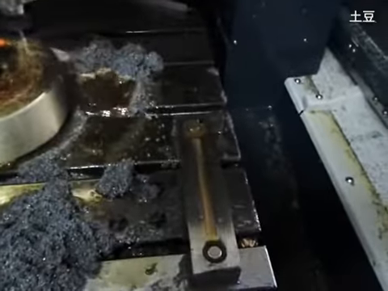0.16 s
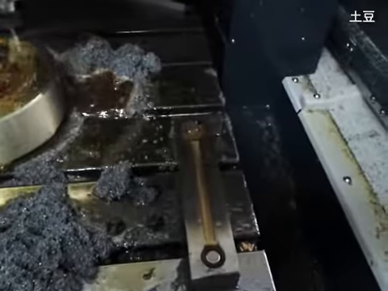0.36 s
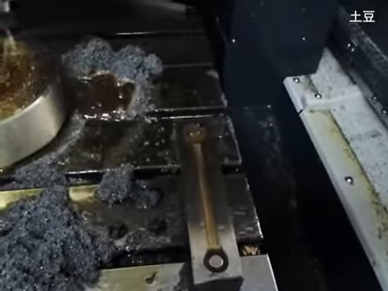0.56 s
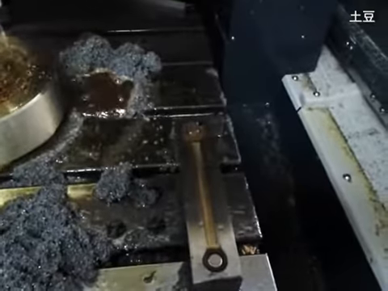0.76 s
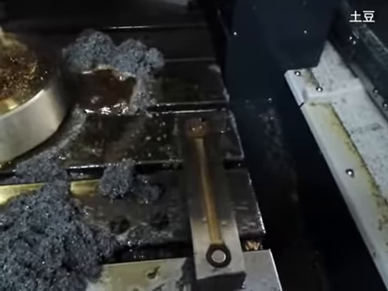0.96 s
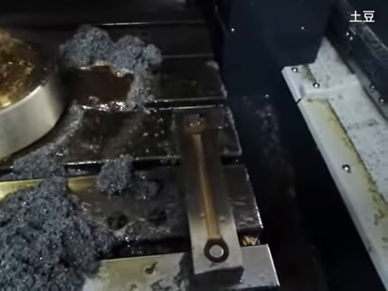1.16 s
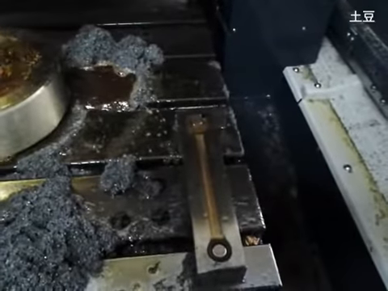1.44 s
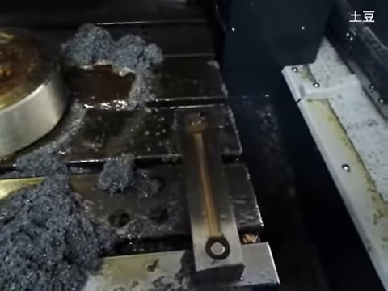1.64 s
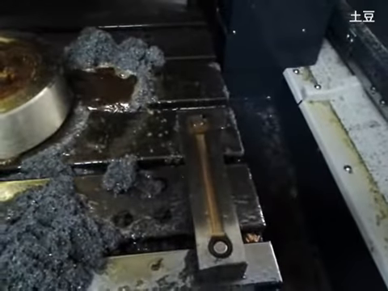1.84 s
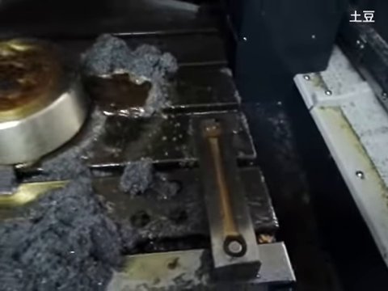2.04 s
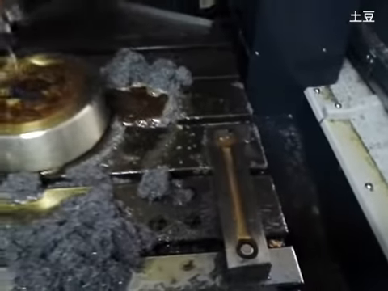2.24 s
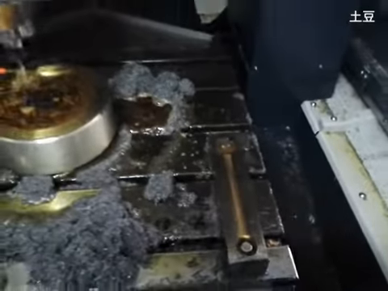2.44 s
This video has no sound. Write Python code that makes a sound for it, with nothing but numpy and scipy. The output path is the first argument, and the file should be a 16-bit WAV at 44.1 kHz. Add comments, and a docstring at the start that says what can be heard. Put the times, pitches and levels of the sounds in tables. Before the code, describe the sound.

A milling machine spindle whines loudly and steadily as it cuts metal in a workshop. Its tones swell and fade as the nearby microphone moves, over a rasping cut, brief chip scrapes, coolant hiss and humming pumps.

```python
"""Milling metal in a workshop

A spindle turns steadily inside a machine enclosure and whines at multiples of its turning rate.
The whines swell and fade as the microphone moves through standing waves (loud and quiet spots).
The motor drive whistles above them, the cut rasps with each turn and chips scrape now and then.
Coolant spray hisses, and pumps hum over the workshop's rumble."""
import sys
import numpy as np
from scipy import signal
from scipy.fft import rfft, irfft
from scipy.io import wavfile

SR = 44100
rng = np.random.default_rng(int(sys.argv[2]) if len(sys.argv) > 2 else 0)


def to_wav(s):
    """Save 16-bit WAV."""
    ch = np.atleast_2d(s).T  # columns
    pcm = np.round(np.clip(ch, -1, 1) * 32767)  # PCM
    wavfile.write(sys.argv[1], SR, pcm.astype(np.int16))


N = 113778


def from_db(db):
    return 10 ** (np.asarray(db) / 20)


def unit_rms(x):
    return x / np.sqrt(np.mean(x ** 2))


def curve(rows):
    """Join (time, value) points with straight lines."""
    return np.interp(np.arange(N) / SR, *np.array(rows, float).T)


def wander(rate):
    """A smooth random wiggle of size about 1 that changes about `rate` times a second."""
    f = np.fft.rfftfreq(2 * N, 1 / SR)
    return unit_rms(irfft(rfft(rng.standard_normal(2 * N)) * np.exp(-(f / rate) ** 2)))[:N]


def colour(x, points):
    """Shape a sound's lows and highs by (frequency, level) points, then scale it to strength 1."""
    hz, db = np.array(points, float).T
    f = np.fft.rfftfreq(N, 1 / SR) + 1
    gain = from_db(np.interp(np.log(f), np.log(hz), db))
    roll_off = np.minimum(f / hz[0], 1) ** 4 * np.minimum(hz[-1] / f, 1) ** 8
    return unit_rms(irfft(rfft(x) * gain * roll_off, N))


def tone(phase, db):
    """A pure tone at the given average (rms) level."""
    return np.sqrt(2) * from_db(db) * np.sin(phase + rng.uniform(0, 2 * np.pi))


# Loudness of the strongest pump: t/s, level/dB
PUMP_LOUDNESS = [(0, -44), (.7, -44.5), (1.1, -37.5), (1.8, -31.5), (2.1, -29), (2.35, -40), (2.58, -48)]
# Tones of pumps, fans and their bearings: f/Hz, first level/dB, last level/dB
HUM_TONES = [(40, -40, -40), (99.5, -38, -37), (295, -47, -47), (549.4, -48, -39), (793, -48, -35),
             (945, -41, -54), (5491, -48, -50), (6104, -42, -53), (6272, -45, -44), (7768, -68, -53),
             (8538, -68, -65)]
# Tone colour of the moving air: f/Hz, relative level/dB
AIR_COLOUR = [(120, -7), (250, -0.5), (400, 0.5), (700, 1), (1100, -0.5), (1500, -4.5), (3000, -32)]
# Tone colour of the rumble: f/Hz, relative level/dB
RUMBLE_COLOUR = [(10, -23.5), (22, -13.5), (40, 4.5), (65, 2), (110, -2.5), (160, 0), (220, -5.5),
                 (400, -32.5)]
# Loudness of the rumble: t/s, level/dB
RUMBLE_LOUDNESS = [(0, -30.5), (.8, -31.5), (1.3, -27.5), (1.8, -29), (2.58, -33.5)]
def workshop(t, pump_hz=82.5, air_db=-30):
    """Pumps and fans hum and their bearings sing over moving air and a low rumble."""
    hum = tone(2 * np.pi * pump_hz * t, curve(PUMP_LOUDNESS))
    for hz, first_db, last_db in HUM_TONES:
        phase = 2 * np.pi * hz * t + 0.43 * wander(3)
        hum += tone(phase, np.linspace(first_db, last_db, N) + 1.5 * wander(3.7))
    air = from_db(air_db) * colour(rng.standard_normal(N), AIR_COLOUR)
    rumble = from_db(curve(RUMBLE_LOUDNESS)) * colour(rng.standard_normal(N), RUMBLE_COLOUR)
    return hum + air + rumble


# Tone colour of the spray: f/Hz, relative level/dB
SPRAY_COLOUR = [(2900, -31), (3400, -12), (3650, -12), (4200, -9.5), (4800, -9), (5300, -7), (5950, -3),
                (6400, -6), (6800, -19), (7150, -15.5), (7350, -25.5), (8100, -33.5), (8450, -39)]
def coolant(level_db=-30, flicker_db=0.82):
    """The spray of cooling liquid hisses with a slight flicker."""
    hiss = colour(rng.standard_normal(N), SPRAY_COLOUR)
    return hiss * from_db(level_db + flicker_db * wander(11))


# Chip scrapes: start t/s, length/s, centre f/Hz, width/Hz, level/dB
CHIP_SCRAPES = [(0.123, 0.14, 2846, 60, -24.5), (0.303, .08, 2850, 60, -34), (0.807, 0.13, 2900, 60, -29),
                (1.11, .09, 1316, 90, -30), (1.116, 0.068, 2820, 90, -24.5), (1.215, 0.067, 2807, 90, -24),
                (2.43, .085, 3430, 450, -25.5), (2.468, 0.03, 3940, 704, -31)]
def chips(t, turn):
    """Chips caught at the tool scrape briefly, pulsing once a turn, and make the metal ring."""
    out = np.zeros(N)
    f = np.fft.rfftfreq(N, 1 / SR)
    for start, length, hz, width, db in CHIP_SCRAPES:
        rub = rng.standard_normal(N) * (1 + 0.47 * np.cos(turn))
        resonance = 1 / (1 + 2j * (f - hz) / width) ** 2
        ring = unit_rms(irfft(rfft(rub) * resonance, N))
        progress = np.clip((t - start) / length, 0, 1)
        out += from_db(db) * ring * np.sqrt(np.abs(np.sin(np.pi * progress)))
    return out


# Loudness of the whistle three turning rates above the switching rate: t/s, level/dB
HIGH_WHISTLE = [(0, -28.5), (.3, -31.5), (.6, -34.5), (1.05, -44), (1.4, -37.5), (1.8, -28.5), (2.1, -37),
                (2.3, -34.5), (2.58, -34)]
# The same for the whistle three turning rates below: t/s, level/dB
LOW_WHISTLE = [(0, -39.5), (.35, -38), (.78, -32.5), (1.05, -33.5), (1.5, -43), (1.7, -38), (2.2, -42),
               (2.58, -44)]
# Fainter whistles: offset in turning rates, first level/dB, last level/dB
FAINT_WHISTLES = [(-9, -45.5, -51), (1, -49, -44.5), (5, -39, -55.5), (9, -51.5, -42.5), (11, -48, -54),
                  (13, -47.5, -51.5)]
def motor_drive(t, turn, switching_hz=5585.3, flutter_db=2.5):
    """The motor's power switches rapidly and whistles at pitches spaced by the turning rate."""
    switching = 2 * np.pi * switching_hz * t
    out = tone(switching + 3 * turn, curve(HIGH_WHISTLE))
    out += tone(switching - 3 * turn, curve(LOW_WHISTLE))
    out *= from_db(flutter_db * wander(22))
    for offset, first_db, last_db in FAINT_WHISTLES:
        db = np.linspace(first_db, last_db, N) + wander(1.5) + flutter_db * wander(16)
        out += tone(switching + offset * turn, db)
    return out


# Tone colour of the cut's rasp: f/Hz, relative level/dB
RASP_COLOUR = [(1000, -25.5), (1220, -12), (1340, -7), (1500, -10.5), (1620, -2.5), (1750, -2),
               (1900, -5.5), (2150, -4.5), (2400, -8), (2520, -5), (2650, -13), (2830, -0.5), (2950, -8),
               (3100, -3), (3200, -18.5), (3400, -36)]
# Loudness of the rasp: t/s, level/dB
RASP_LOUDNESS = [(0, -18), (.17, -20.5), (.3, -21), (.7, -22), (.83, -23.5), (1.05, -24), (1.22, -20.5),
                 (1.45, -23.5), (1.7, -20), (1.9, -24), (2.15, -21.5), (2.58, -24.5)]
def cutting(turn, flicker_db=1.3):
    """The cutting edges tear metal in step with the turning and make the workpiece ring."""
    bite = 1 + 0.14 * np.cos(turn) + 0.25 * np.cos(2 * turn)  # pulses once and twice a turn
    rasp = colour(rng.standard_normal(N) * bite, RASP_COLOUR)
    return rasp * from_db(curve(RASP_LOUDNESS) + flicker_db * wander(20))


# Loudness of the main whine at 15 times the turning rate: t/s, level/dB
MAIN_WHINE_15 = [(0, -20.5), (.17, -18.5), (.42, -19.5), (.52, -17.5), (1.1, -15.3), (1.45, -15),
                 (1.7, -17), (1.95, -20), (2.08, -18.8), (2.42, -25.5), (2.58, -25.5)]
# The same for the main whine at 16 times: t/s, level/dB
MAIN_WHINE_16 = [(0, -21), (.45, -20), (.7, -19), (.98, -15), (1.28, -16.5), (1.65, -22), (1.8, -25),
                 (1.92, -35), (2.08, -35), (2.27, -21.5), (2.58, -20)]
# Other strong whines: multiple, first level/dB, last level/dB, swell or dip t/s, its height/dB
STRONG_WHINES = [(4, -32, -42.5, 1.28, 5), (8, -42, -26, 0.65, -5.5), (9, -32.5, -36, 1.03, -18.5),
                 (12, -25, -46, 2.45, 9.5), (17, -44.5, -30.5, 1.35, 11), (18, -35, -29.5, 0.22, 10.5),
                 (19, -28, -33.5, 1.4, -10), (20, -26.5, -32, 2.24, 9), (23, -25.5, -47, 1.7, 9.5),
                 (26, -26, -25, 2.32, -13), (28, -32, -25.5, 0.9, -8)]
# Weak overtones that make the buzz: multiple, level/dB
BUZZ_TONES = [(3, -49.5), (7, -49), (10, -49.5), (11, -46), (13, -47), (21, -36), (22, -42), (24, -45),
              (25, -37), (27, -38.5), (29, -48), (30, -50), (31, -46.5), (35, -49), (36, -45.5), (37, -46),
              (39, -44), (42, -51), (43, -54), (46, -55.5), (47, -50), (51, -53), (53, -46)]
def spindle(t, turn, swell_s=0.31, drift_rad=0.45, trim_db=-0.03):
    """Tool and workpiece ring at multiples of the turning rate; each tone fades in its own way."""
    out = np.zeros(N)
    for multiple, loudness in ((15, MAIN_WHINE_15), (16, MAIN_WHINE_16)):
        out += tone(multiple * turn, curve(loudness) + 0.8 * wander(17))
    for multiple, first_db, last_db, when, swell_db in STRONG_WHINES:
        swell = swell_db * np.exp(-((t - when) / swell_s) ** 2)
        db = np.linspace(first_db, last_db, N) + swell + trim_db
        out += tone(multiple * turn + drift_rad * wander(2), db + 1.14 * wander(27))
    for multiple, db in BUZZ_TONES:
        phase = multiple * turn + drift_rad * wander(2.2)
        out += tone(phase, db + 2 * wander(1.5) + 2.5 * wander(18))  # slow fades, quick flutter
    return out


def scene(spindle_hz=109.875, wobble=0.0002):
    """All sources at one microphone; `turn`, the spindle's angle, keeps the machine's sounds in step."""
    t = np.arange(N) / SR
    turning_hz = spindle_hz * (1 + wobble * wander(9.2))
    turn = 2 * np.pi * np.cumsum(turning_hz) / SR
    machine = spindle(t, turn) + motor_drive(t, turn) + cutting(turn) + chips(t, turn)
    return (machine + coolant() + workshop(t))[None]


def record(dry):
    """The recorder cuts the treble steeply above 8680 Hz."""
    return signal.sosfilt(signal.ellip(12, .1, 90, 8680, fs=SR, output="sos"), dry)


dry = scene()
out = record(dry)
to_wav(out)
```